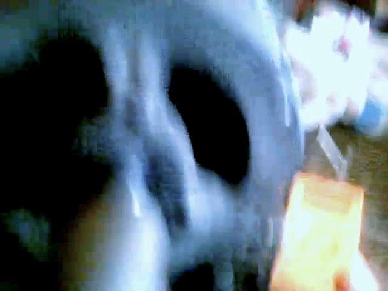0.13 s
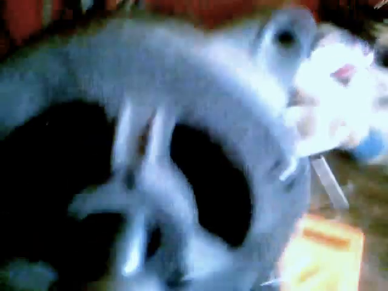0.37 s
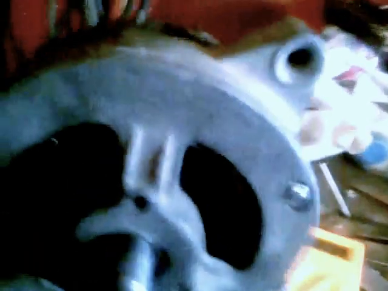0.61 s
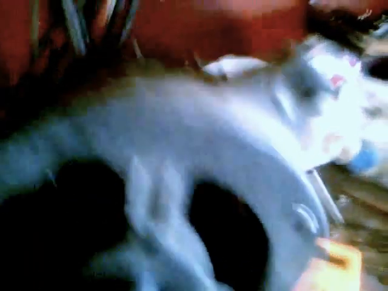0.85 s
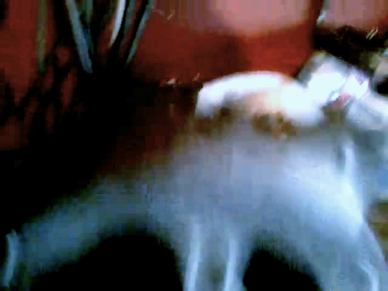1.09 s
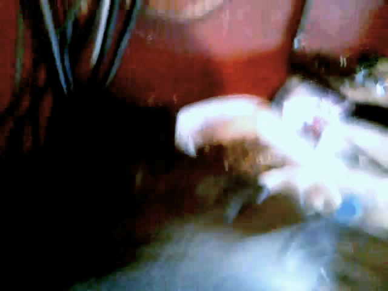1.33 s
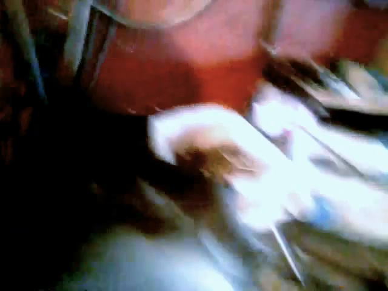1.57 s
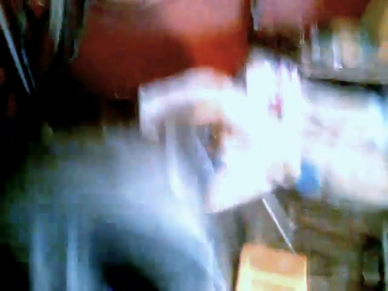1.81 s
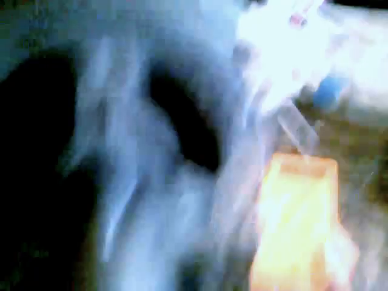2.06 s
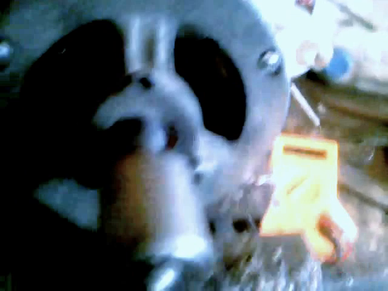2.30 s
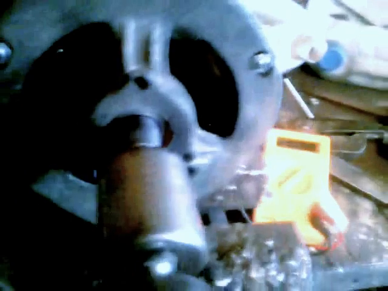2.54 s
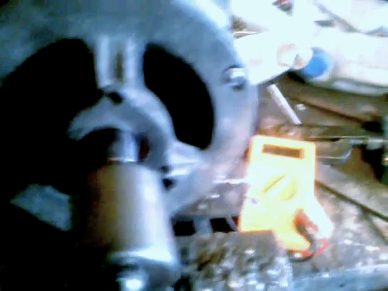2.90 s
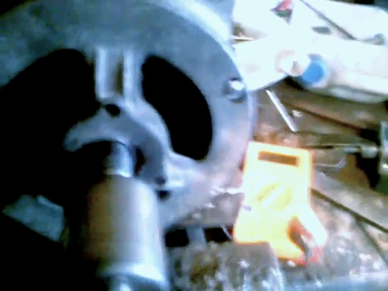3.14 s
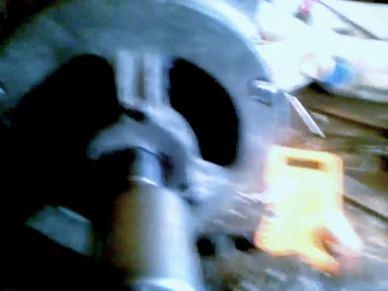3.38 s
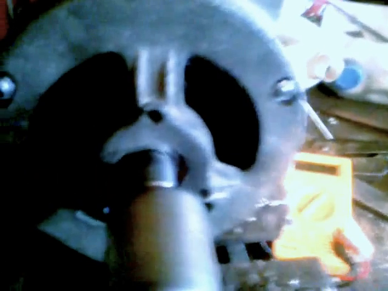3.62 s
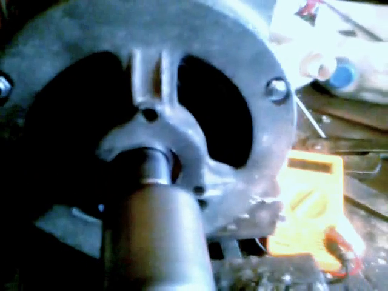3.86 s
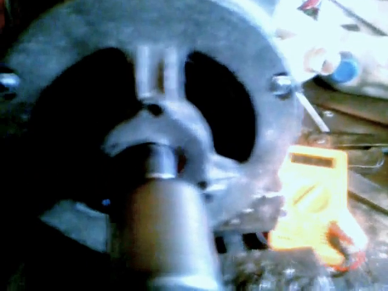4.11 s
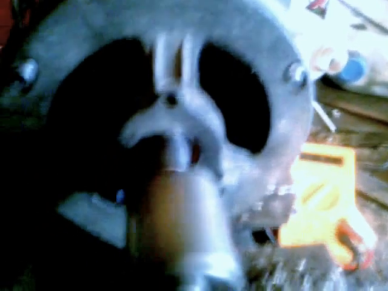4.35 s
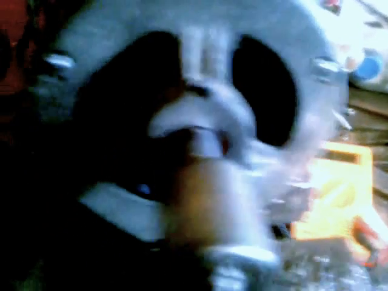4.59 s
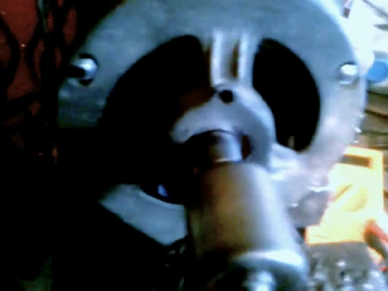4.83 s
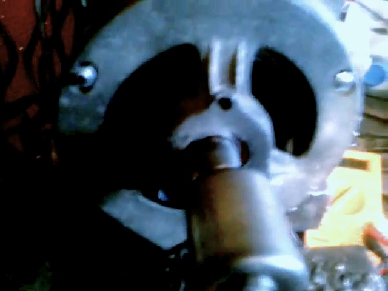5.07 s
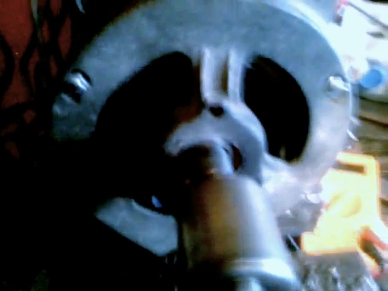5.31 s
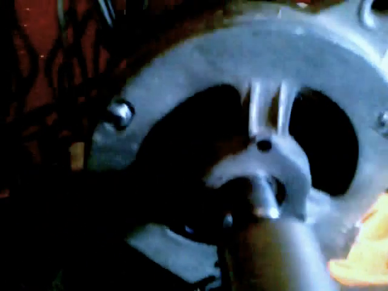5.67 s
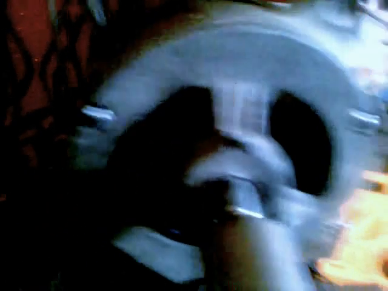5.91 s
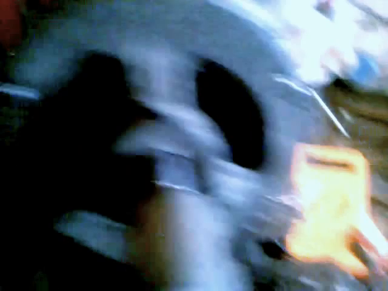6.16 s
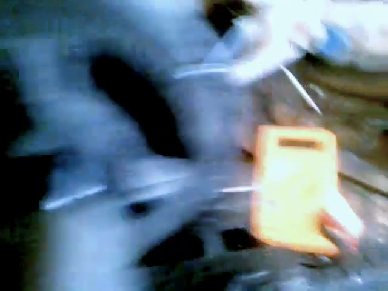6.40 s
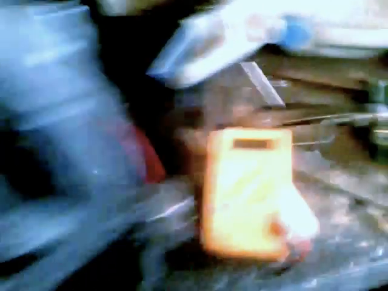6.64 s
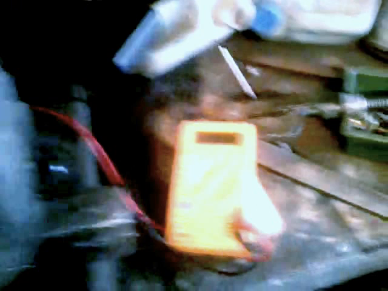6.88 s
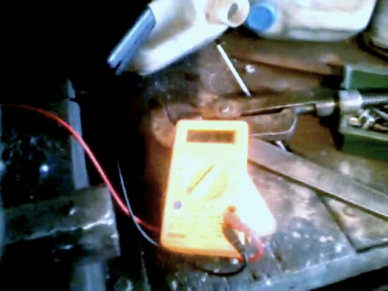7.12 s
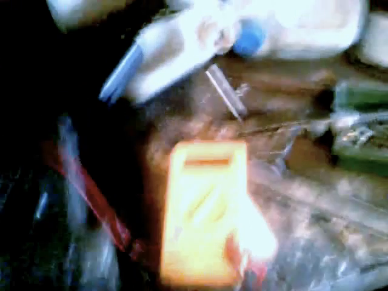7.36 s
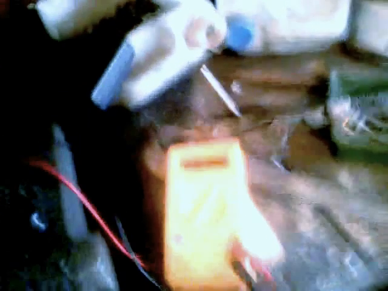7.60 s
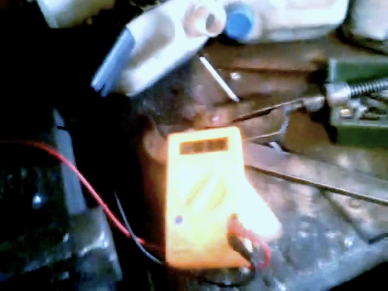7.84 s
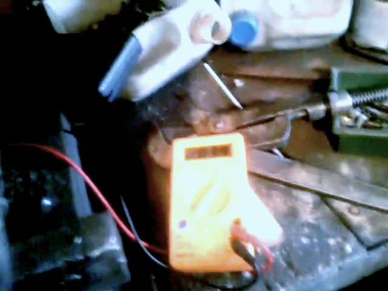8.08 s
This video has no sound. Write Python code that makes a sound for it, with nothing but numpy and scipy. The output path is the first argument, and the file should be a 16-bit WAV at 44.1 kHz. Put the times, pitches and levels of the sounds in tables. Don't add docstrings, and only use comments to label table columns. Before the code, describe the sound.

Quiet workshop hiss with handling rustle and sharp metal clicks, then a motor snaps on, clattering unevenly before racing into a harsh, overloaded rattling whir.

```python
import sys
import numpy as np
from scipy import signal
from scipy.fft import rfft, irfft
from scipy.io import wavfile

SR = 44100
rng = np.random.default_rng(int(sys.argv[2]) if len(sys.argv) > 2 else 0)


def rack_gain(trim_db):
    fader = np.asarray(trim_db, float)
    return 10 ** (fader / 20)


def master(y):
    cut = np.clip(np.atleast_2d(y).T, -1, 1)
    pcm = np.round(cut * 32767)
    wavfile.write(sys.argv[1], SR, pcm.astype(np.int16))


N = 366912

BENCH_END_S, MOTOR_START_S = 2.881, 2.895


def rms_one(x):
    return x / np.sqrt(np.mean(x ** 2) + 1e-20)


def in_time(rows):
    s, *columns = np.transpose(rows)
    return [np.interp(np.arange(N) / SR, s, column) for column in columns]


def at_hz(points, hz):
    table_hz, value = np.transpose(points)
    return np.interp(np.log(hz + 1), np.log(table_hz), value)


def band(x, low_hz, high_hz):
    return signal.sosfilt(signal.butter(2, [low_hz, high_hz], "band", fs=SR, output="sos"), x)


def drift(rate):
    knots = rng.standard_normal(2000)
    return np.interp(np.arange(N) / SR * rate, np.arange(len(knots)), knots)


def bursts(seconds, db, decay_s):
    kicks = np.zeros(N)
    kicks[np.minimum((seconds * SR).astype(int), N - 1)] = rack_gain(db)
    after_bench = kicks[round(BENCH_END_S * SR):] + 1e-18
    return signal.lfilter([1], [1, -np.exp(-1 / (decay_s * SR))], after_bench)


def floor():
    # frequency in Hz, level in dB
    hiss_colour = [(12, -39), (20, -7), (55, -5), (76, -21), (282, -17), (333, -11), (383, -13.5),
                   (1070, -7.5), (2090, -11), (2340, -8), (2690, -10.5), (3760, -6.5), (10000, -10),
                   (12000, -17), (15600, -16)]
    # time in seconds, rumble in dB, rustle in dB
    handling = [
        (0.0, -72, -70),
        (0.35, -70, -66),
        (0.7, -58, -48),
        (0.84, -62, -56),
        (1.0, -57, -51),
        (1.12, -64, -55),
        (1.23, -67, -67),
        (1.75, -71, -68),
        (2.3, -75, -76),
    ]
    hiss_db = -58.5
    white = rng.standard_normal((3, N))
    hiss = irfft(rfft(white[0]) * rack_gain(at_hz(hiss_colour, np.fft.rfftfreq(N, 1 / SR))), N)
    rumble_db, rustle_db = in_time(handling)
    rumble = rack_gain(rumble_db - 5.5 + 2.5 * drift(25)) * rms_one(band(white[1], 110, 340))
    rustle = rack_gain(rustle_db - 2.5 + 2.1 * drift(40)) * rms_one(band(white[2], 7000, 12200))
    return rack_gain(hiss_db) * rms_one(hiss) + rumble + rustle


def room_echo():
    # frequency in Hz, time to fall 60 dB in seconds
    decay_times = [(400, 0.5), (1500, 0.44), (3000, 0.46), (8000, 0.27), (14000, 0.32)]
    t = np.arange(SR // 2) / SR
    tail = np.zeros(len(t))
    for hz in 330 * 2. ** np.arange(.5, 5.6):
        octave = band(rng.standard_normal(len(t)), hz / 1.41, hz * 1.41)
        tail += octave * rack_gain(-60 * t / at_hz(decay_times, hz))
    tail = tail * (1 - np.exp(-t / 0.0026))
    return tail / np.sqrt(np.sum(tail ** 2))


def clicks():
    # time in seconds, peak in dB, ring in Hz, room in dB
    metal = [(0.522, -41, 11000, -7), (0.642, -32, 8500, -3), (0.6513, -23, 8800, -5),
             (0.672, -11, 8100, -6.5), (0.6785, -4, 8220, -20), (0.68, -14, 8700, -17),
             (0.6857, -0.5, 8350, -30), (0.8154, -38, 5510, -8), (0.9065, -33, 10500, -22),
             (1.0715, -26, 8600, -7), (1.0718, -18, 4300, -17), (1.084, -25, 5000, -9),
             (1.082, -26, 9000, -7), (1.3594, -44, 11000, -12), (1.575, -44, 11500, -14),
             (2.5092, -30, 9540, -28), (2.6764, -30, 9460, -24), (2.836, -35, 10200, -20)]
    # time in seconds, peak in dB, ring in Hz, room in dB
    plastic = [(0.236, -40, 1960, -26), (0.652, -30, 2600, -16), (0.68, -27, 2100, -23),
               (0.685, -26, 2060, -11.5), (0.907, -27, 2150, -19), (0.912, -32, 2330, -29),
               (0.942, -40, 1840, -16), (1.057, -30, 2020, -12), (1.063, -27.5, 2700, -8),
               (1.072, -14.5, 2200, -24), (1.083, -23, 2610, -27), (1.086, -29.5, 3000, -8),
               (1.089, -16.5, 2110, -32), (1.823, -28.5, 1920, -29), (1.919, -49, 2040, -14)]
    # time in seconds, peak in dB, ring in Hz, room in dB, ring width in Hz
    bench = [
        (.9135, -47, 770, -21, 25),
        (.9075, -33, 1100, -22, 300),
        (.2365, -43, 1000, -30, 400),
        (1.252, -43, 950, -21, 400),
        (1.5865, -35, 1500, -28, 1300),
        (1.8222, -31, 720, -26, 300),
        (1.826, -44, 680, -30, 40),
    ]
    hits = [(*row, 2200, -3.5) for row in metal]
    hits += [(*row, 430, -7) for row in plastic]
    hits += [(*row, -28) for row in bench]
    crack_top_db = -21

    out, t, echo = np.zeros(N + SR), np.arange(3000) / SR, room_echo()
    crack = band(1. * (t == 0), 1600, 9800)
    for s, db, hz, room_db, width_hz, crack_db in hits:
        ring = band(np.sin(2 * np.pi * hz * t) * np.exp(-np.pi * width_hz * t), .62 * hz, 16000)
        direct = rack_gain(db + 3.0) * ring + rack_gain(min(db + crack_db, crack_top_db) + 10.5) * crack
        wet = rack_gain(room_db + 16.5) * signal.fftconvolve(direct, echo)
        at = round(s * SR)
        out[at:at + len(t)] += direct
        out[at:at + len(wet)] += wet
    return out[:N]


def side_patches():
    # middle in seconds, centre in Hz
    patches = [(4.31, 8900), (4.31, 5200), (4.66, 4700), (4.729, 5800), (5.055, 6300), (5.264, 4700),
               (5.264, 7600), (5.264, 9600), (5.472, 13100), (5.518, 6300), (5.566, 7600), (5.566, 4700),
               (5.776, 6000), (5.885, 5700), (5.891, 14800), (5.962, 14000), (6.031, 7900), (6.17, 12000),
               (6.263, 7600), (6.263, 9600), (6.495, 5700), (6.517, 15000), (6.704, 4900), (7.099, 9300),
               (7.146, 8900), (7.285, 7600), (7.354, 13000), (7.379, 10200), (7.933, 12300), (8.004, 12000)]
    # centre in Hz, level in dB
    patch_levels = [(4500, -23.5), (8000, -14.5), (10000, -16.5), (12000, -26.5), (15000, -25)]
    patch_s, width_hz = .046, 1400
    side, size = np.zeros(N), round(patch_s * SR)
    hz = np.fft.rfftfreq(size, 1 / SR)
    fade = signal.windows.tukey(size, .7)
    for s, centre_hz in patches:
        inside = np.abs(hz - centre_hz) < width_hz / 2
        noise = irfft(rfft(rng.standard_normal(size)) * inside, size)
        at = round(s * SR) - size // 2
        side[at:at + size] += rack_gain(at_hz(patch_levels, centre_hz)) * rms_one(noise) * fade
    return side


def switch():
    snap_db, snap_s = -20, .003
    t = np.arange(N) / SR - MOTOR_START_S
    snap = rng.standard_normal(N) * np.exp(-np.abs(t) / snap_s)
    return rack_gain(snap_db) * band(snap, 4100, 10800)


def hum(turning, hum_db):
    # time in seconds, pitch in Hz, level in dB
    rotor_path = [(2.97, 172, -44), (3.46, 165, -46), (3.66, 192, -33), (3.76, 198, -35), (3.88, 192, -40),
                  (3.95, 285, -55), (4.1, 294, -42), (4.3, 300, -44), (4.5, 322, -36), (5, 331, -38),
                  (5.4, 359, -35), (5.6, 368, -31), (5.9, 377, -31), (6.3, 380, -31), (6.7, 370, -35),
                  (7.1, 362, -36), (8.32, 355, -43)]
    rotor_hz, rotor_db = in_time(rotor_path)
    spin = 2 * np.pi * np.cumsum(rotor_hz) / SR + 0.61 * drift(9)
    tone = rack_gain(hum_db + 3 + 0.28 * drift(9.7)) * np.sin(2 * np.pi * turning)
    octave = rack_gain(-3 + 2.5 * drift(9)) * (rotor_hz > 310) * np.sin(2 * spin + 0.7 * drift(25))
    rotor = rack_gain(rotor_db + 3.5 + 2.0 * drift(18)) * (np.sin(spin) + octave)
    fade_in = np.clip((np.arange(N) / SR - 2.98) / 0.056, 0, 1)
    return np.sqrt(2) * (tone + rotor) * fade_in


def slow_blows():
    # time in seconds, level in dB
    slack = [
        (2.8951, -17.5),
        (2.9607, -22),
        (2.974, -14.5),
    ]
    # time in seconds, level in dB
    main_blows = [(2.9843, -6.5), (3.0102, -2), (3.0412, -4), (3.054, -5.5), (3.0862, -7), (3.1217, -7),
                  (3.1547, -4), (3.1877, -4), (3.2192, -6.5), (3.252, -5.5), (3.2755, -7.5), (3.2944, -5),
                  (3.3193, -3), (3.3609, -5.5), (3.382, -5.5), (3.4093, -6), (3.4405, -6.5), (3.4658, -7),
                  (3.489, -5.5), (3.5252, -6), (3.55, -8.5), (3.5747, -12), (3.594, -7), (3.6275, -7.5),
                  (3.6509, -7.5), (3.6805, -6), (3.7158, -7.5), (3.754, -7.5), (3.7816, -8), (3.807, -5.5)]
    rebound_s, rebound_loss_db, each_loss_db, spread_db = .0098, 4, 1.7, 3
    s, db = np.transpose(slack + main_blows)
    chance, k = rng.standard_normal((len(s), 2, 6)), np.arange(1, 7)
    gap = np.diff(s, append=s[-1])[:, None]
    parts = np.maximum(np.round(gap / rebound_s), 1)
    later_s = s[:, None] + gap * k / parts + .0012 * chance[:, 0]
    later_db = db[:, None] - rebound_loss_db - each_loss_db * k + spread_db * chance[:, 1]
    in_gap = k < parts
    return np.r_[s, later_s[in_gap]], np.r_[db, later_db[in_gap]]


def rings(force):
    # first pitch in Hz, last pitch in Hz, width in Hz, level in dB
    slow_rings = [(5450, 5430, 200, -13.5), (6760, 6200, 160, -14.5), (9380, 9500, 500, -12.5)]
    pickup_rings = [(2350, 2620, 120, -3)]
    facing_rings = [(4150, 4650, 450, -12), (7400, 8900, 400, -12), (13350, 13800, 400, -18),
                    (1950, 2080, 300, -9)]
    away_rings = [(5567, 5500, 450, -13.5), (1799.5, 1980, 330, -9.5), (1093, 1070, 58, -16),
                  (1410, 1380, 74, -21)]
    fast_rings = [(7316, 7000, 530, -12.5), (10314, 10200, 950, -9.5)]
    # start in seconds, end in seconds
    spans = [
        (2.7, 3.75),
        (3.56, 3.86),
        (3.75, 6.8),
        (5.9, 8.6),
        (3.9, 8.6),
    ]
    unevenness = [4.5, 2.5, 2.5, 2.5, 2.5]
    stages = [slow_rings, pickup_rings, facing_rings, away_rings, fast_rings]
    out = np.zeros(N)
    for (start, end), uneven_db, stage in zip(spans, unevenness, stages):
        now = np.arange(round(start * SR), min(round(end * SR), N))
        part = np.clip((now / SR - start) / (end - start), 0, 1)
        fade = np.sqrt(np.abs(np.sin(np.pi * part)))
        for first_hz, last_hz, width_hz, db in stage:
            glide_hz = first_hz + part * (last_hz - first_hz)
            carrier = np.exp(2j * np.pi * np.cumsum(glide_hz) / SR)
            drive = force[now] * (rng.standard_normal((len(now), 2)) @ [1, 1j])
            r = np.exp(-np.pi * width_hz / SR)
            slow = signal.lfilter([np.sqrt(1 - r * r)], [1, -r], drive)
            struck_db = db + uneven_db * drift(70)[now]
            out[now] += rack_gain(struck_db) * fade * np.real(slow * carrier)
    return out


def rattle(turning):
    # time in seconds, grind in dB, run of knocks in dB, microphone turned away from 0 to 1
    rattle_path = [(2.895, -39, -65, 0), (2.965, -36, -60, 0), (2.985, -19, -45, 0), (3.6, -17, -29, 0),
                   (3.8, -13, -18, 0), (3.84, -12, -1, 0.3), (4.05, -7.5, 1.5, 0.6), (4.3, -6, 1, 0.6),
                   (4.8, -5.5, -2, 0.42), (5.3, -5.5, -3.5, 0.38), (6.2, -2, -10.5, 0.7),
                   (6.9, -4.5, -1.5, 0.99), (8.32, -4.5, 1.8, 0.57)]
    contacts = [
        0.5,
        -7,
        -3.5,
    ]
    # frequency in Hz, level in dB per Hz
    slow_colour = [(59, -52), (100, -34), (170, -9), (218, -13), (457, -12.5), (589, -6), (958, -5.5),
                   (1090, -3), (1260, -1), (2230, 3.5), (3470, -13), (5410, -5), (5890, -9), (9570, -3.5),
                   (15600, -23)]
    # frequency in Hz, level in dB per Hz
    facing_colour = [(130, -25), (220, -27), (287, -31), (356, -22), (425, -23), (739, -13), (1480, -3.5),
                     (1680, -14.5), (2000, 0), (3480, -23.5), (4240, -10), (5740, -13), (7100, -5.5),
                     (10300, -6), (15600, -16)]
    # frequency in Hz, level in dB per Hz
    away_colour = [(130, -35), (220, -18), (356, -23), (433, -22), (536, -9.5), (932, -11.5), (1070, -9.5),
                   (1480, -6.5), (1900, -2), (3300, -14), (5540, -8), (6160, -13), (10300, -9),
                   (12100, -16), (15600, -22.5)]
    tilt_db = 0.8

    on = round(BENCH_END_S * SR)
    grind_db, run_db, away = in_time(rattle_path)
    at = np.flatnonzero(np.diff(np.floor(turning)) > 0)
    chance = rng.standard_normal((len(at), 2))
    run_each_db = run_db[at] + np.array(contacts)[np.arange(len(at)) % 3] + 1.7 * chance[:, 1]
    blow_s, blow_db = slow_blows()
    all_s = np.r_[blow_s, at / SR + .0006 * chance[:, 0]]
    all_db = np.r_[1.3 * blow_db + 7, run_each_db]
    fast = np.clip((np.arange(on, N) / SR - 3.7) / 0.33, 0, 1)
    grind, away = rack_gain(grind_db + 0.91 * drift(14))[on:], away[on:]

    housing = 0
    edges = np.r_[80 * 2 ** (np.arange(10) / 2.5), 1280 * 2 ** (np.arange(19) / 4.9)]
    for low, high in zip(edges, edges[1:]):
        hz = np.sqrt(low * high)
        ring_s = .0033 * (hz / 2000) ** -.42
        each_db = all_db + min(3.4, hz / 150) * rng.standard_normal(len(all_s))
        force = grind + bursts(all_s, each_db, ring_s)
        slow_db, facing_db = at_hz(slow_colour, hz), at_hz(facing_colour, hz)
        speed_db = facing_db + away * (at_hz(away_colour, hz) - facing_db)
        colour_db = slow_db + fast * (speed_db - slow_db) + tilt_db * np.log2(hz / 2000)
        colour_db += 1.04 * drift(2.46)[on:]
        housing = housing + rack_gain(colour_db) * band(force * rng.standard_normal(N - on), low, high)

    before = np.zeros(on)
    whole_force = np.r_[before, grind + bursts(all_s, all_db, .003)]
    return rack_gain(5.5) * np.r_[before, housing] + rack_gain(-3.5) * rings(whole_force)


def scene():
    # time in seconds, knocks per second, hum in dB
    speed = [(2.97, 96.3, -55), (3.05, 96, -45), (3.15, 93.4, -54), (3.33, 88.5, -48), (3.59, 89.3, -50),
             (3.83, 110.5, -49), (4.04, 142.4, -41), (4.27, 146, -42), (4.55, 161, -41), (5.01, 164.9, -28),
             (5.29, 169.7, -31), (5.49, 173.9, -24), (5.58, 174.9, -35), (5.74, 177.9, -25),
             (6.1, 183.6, -26), (6.71, 179.7, -24), (7.01, 175.4, -32), (7.32, 174.1, -22)]
    coast_per_s2 = 2.4
    per_s, hum_db = in_time(speed)
    t = np.arange(N) / SR
    coasting_s = np.maximum(t - speed[-1][0], 0)
    turning = np.cumsum(per_s - coast_per_s2 * coasting_s) / SR
    bench = floor() + clicks()
    motor = switch() + hum(turning, hum_db) + rattle(turning)
    mono = bench * (t < BENCH_END_S) + motor * (t > MOTOR_START_S)
    return np.array([mono, mono])


def overload(x):
    clip_top, hardness = .7, 6.0
    flat = x / (1 + np.abs(x / clip_top) ** hardness) ** (1 / hardness)
    return signal.sosfilt(signal.butter(1, 30, "high", fs=SR, output="sos"), flat)


def dip_and_cut(x):
    dip_hz, dip_width_hz, dip_share, cutoff_hz = 12500, 630, 0.41, 16100
    notched = signal.filtfilt(*signal.iirnotch(dip_hz, dip_hz / dip_width_hz, SR), x)
    dipped = x + dip_share * (notched - x)
    return signal.sosfiltfilt(signal.cheby2(12, 30, cutoff_hz, fs=SR, output="sos"), dipped)


def band_limit(x):
    return signal.sosfilt(signal.butter(12, 15710, fs=SR, output="sos"), x)


def record(dry):
    heard = dip_and_cut(overload(dry))
    mix = np.clip(heard + side_patches() * [[1], [-1]], -1, 1)
    return band_limit(mix)


dry = scene()
out = record(dry)
master(out)
```